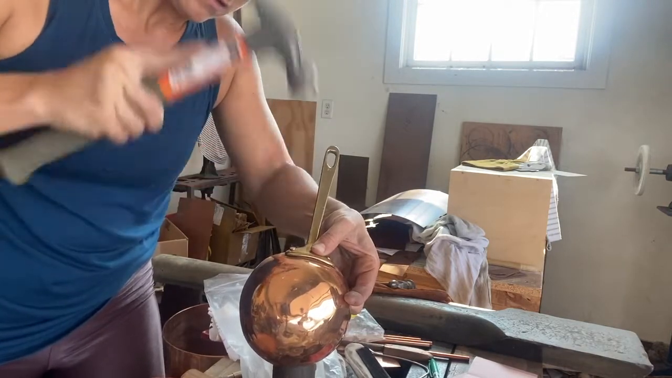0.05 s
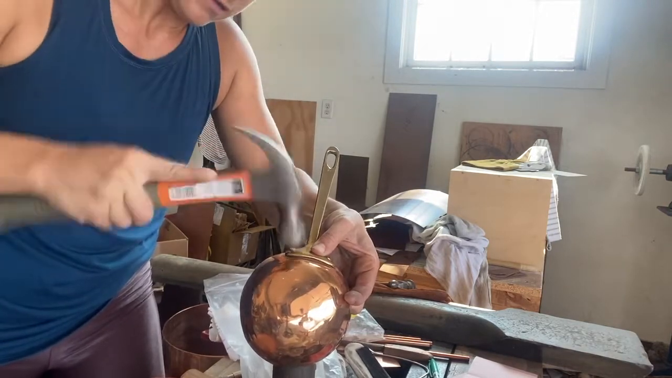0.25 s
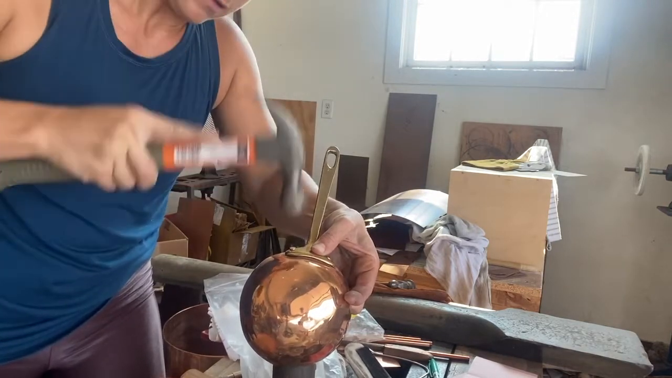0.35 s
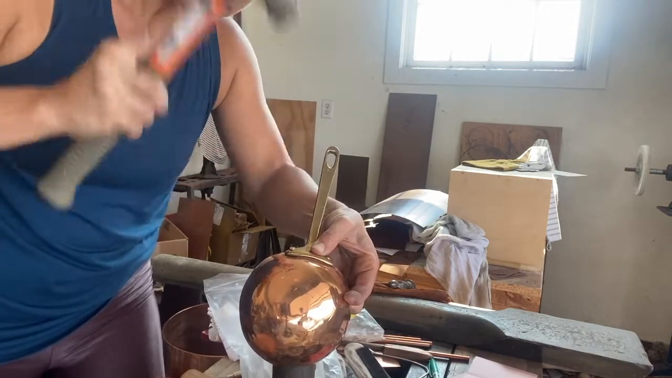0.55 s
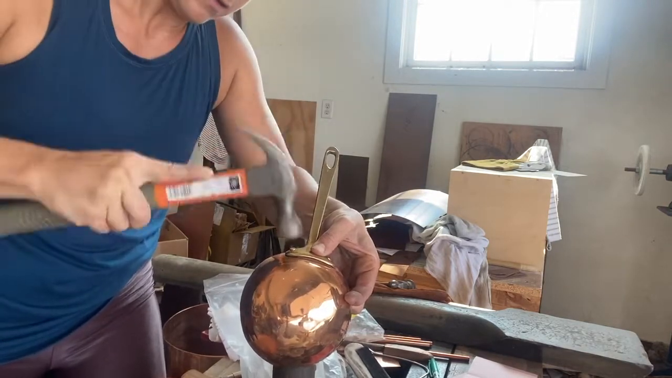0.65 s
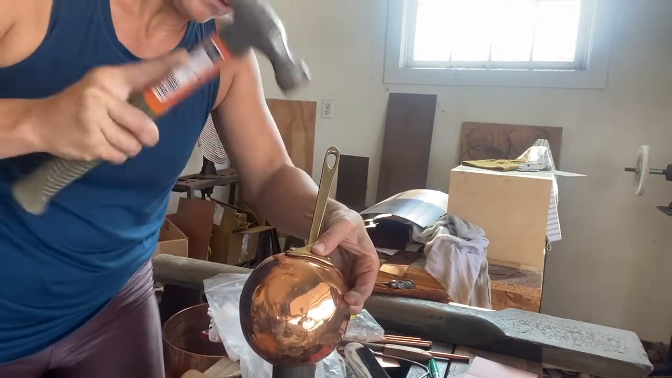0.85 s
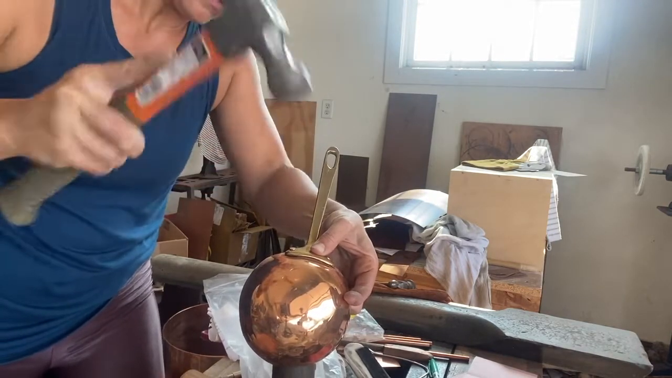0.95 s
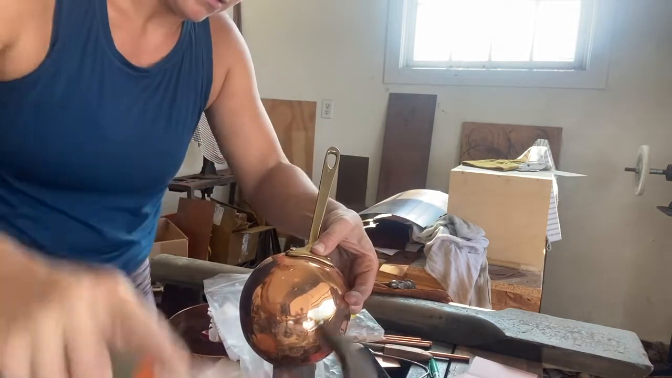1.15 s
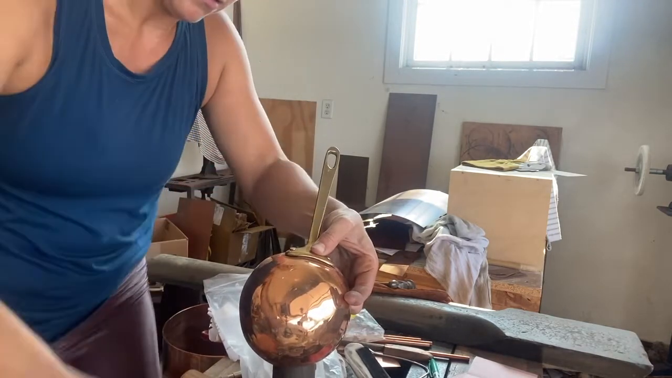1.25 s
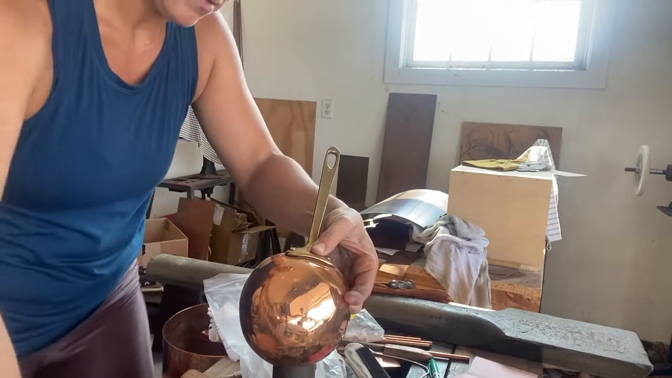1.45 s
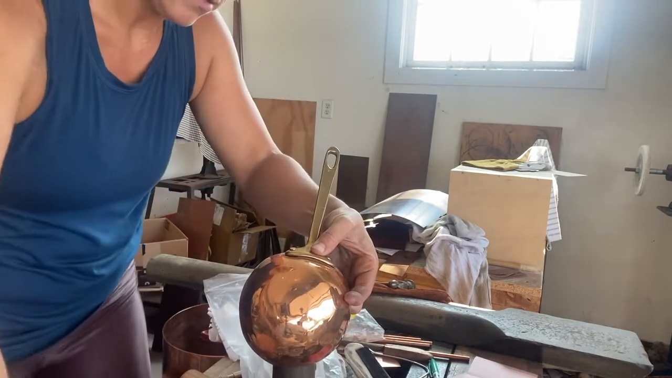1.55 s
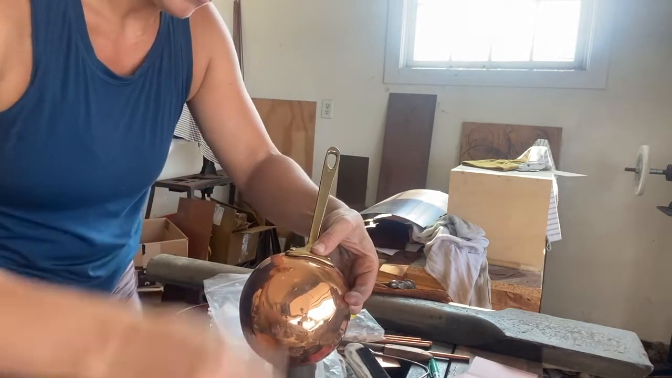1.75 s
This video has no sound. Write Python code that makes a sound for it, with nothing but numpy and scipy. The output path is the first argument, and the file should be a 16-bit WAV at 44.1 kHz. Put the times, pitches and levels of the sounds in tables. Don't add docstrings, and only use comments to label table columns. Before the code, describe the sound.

Hammer blows on a rivet in a copper bowl over an iron stake, close up in a small workshop. A fading metal rattle opens; at 0.23 s a sharp steel crack with copper knock, brief high ring and low thump; bowl and tools clink around 0.38-0.55. A harder blow lands at 0.61, rattling from 0.7 to 0.87. Then quiet low hum, very faint cloth rustle near 1.45.

```python
import sys
import numpy as np
from scipy import signal
from scipy.fft import rfft, irfft, next_fast_len
from scipy.io import wavfile
from scipy.ndimage import uniform_filter1d

SR = 44100
rng = np.random.default_rng(int(sys.argv[2]) if len(sys.argv) > 2 else 0)


def put_to_file(sound):
    columns = np.atleast_2d(sound).T
    safe = np.clip(columns, -1, 1)
    whole_steps = np.round(safe * 32767)
    wavfile.write(sys.argv[1], SR, whole_steps.astype(np.int16))


def level_to_linear(level):
    exponent = np.asarray(level, float) / 20
    return 10 ** exponent


N = 79380
SAG_S = 0.0072


def unit(x):
    return x / np.sqrt(np.mean(x ** 2) + 1e-20)


def along(points, hz):
    f, value = np.transpose(points)
    return np.interp(np.log(hz + 1), np.log(f + 1), value)


def filtered(x, response):
    size = next_fast_len(N + SR // 2)
    hz = np.fft.rfftfreq(size, 1 / SR)
    return irfft(rfft(x, size) * response(hz), size)[..., :N]


def rush(spectrum, alike, source=None):
    pair = rng.standard_normal((2, N))
    if source is not None:
        pair = pair * source

    def colour(hz):
        turn = np.arccos(np.clip(along(alike, hz), -1, 1)) / 2
        return level_to_linear(along(spectrum, hz)) * [np.cos(turn), np.sin(turn)]

    mid, side = filtered(pair, colour)
    return unit(np.array([mid + side, mid - side]))


def ring(s, hz, db, t60, lead=0, rise=.001, spread=0.2, sag_hz=0):
    out = np.zeros((2, N))
    first = int(s * SR) + 1
    t = np.arange(first, min(N, first + int(2 * t60 * SR))) / SR - s
    phase = rng.normal(0, 1, (2, 1)) * spread + lead * np.array([[.5], [-.5]])
    turns = hz * t + sag_hz * SAG_S * (1 - np.exp(-t / SAG_S))
    swell = 1 - np.exp(-t / abs(rise))
    out[:, first:first + len(t)] = level_to_linear(db - 60 * t / t60) * swell * np.sin(2 * np.pi * turns + phase)
    return out


# f/Hz, level/dB
CRACK_COLOUR = [(1500, -27.5), (3600, -8), (5200, -15), (8300, -1.5), (11000, -7.5), (13000, -7.5),
                (15500, -13.5)]
# f/Hz, level/dB
KNOCK_COLOUR = [(150, -10.5), (500, 3), (1500, -4.5), (2200, -8), (3700, -1.5), (5200, -12.5), (9000, -17)]
# f/Hz, likeness
NEAR = [(100, 0.88), (600, 1), (2500, 0.23), (6000, 0.26), (7500, 1)]


def crack(s, db, contact_s, shudder_db):
    crack_t60, shudder_t60 = .008, .08
    knock_db, knock_rise_s, knock_t60 = 1.5, 0.0011, .04
    t = np.arange(N) / SR - s
    struck, age = t > 0, np.abs(t)
    late = np.clip(t - contact_s, 0, None)
    snap = struck * (level_to_linear(-60 * late / crack_t60) + level_to_linear(shudder_db - 60 * late / shudder_t60))
    give = struck * (1 - np.exp(-age / knock_rise_s))
    give = give * (level_to_linear(-60 * age / knock_t60) + level_to_linear(-16 - 60 * late / .15))
    steel = snap * rush(CRACK_COLOUR, NEAR)
    copper = level_to_linear(knock_db) * give * rush(KNOCK_COLOUR, NEAR)
    return level_to_linear(db) * (steel + copper)


# f/Hz, level/dB, time to fall 60 dB/s
STAKE = [(1207, -18, 0.17), (1510, -11, .08), (2480, -16.5, 0.068), (3465, -8, .05), (5850, -17.5, .03),
         (6200, -26, 0.23), (7000, -21, .1), (8210, -5.5, .06), (8200, 4.5, .06), (8670, -4.5, 0.049),
         (9550, -13, .06), (9600, -13.5, 0.04), (12300, -13.5, 0.068)]


def stake_ring(s, contact_s, blow_db):
    level_db, damp_db, damp_s = -16.5, -19, 0.00089
    late = np.clip(np.arange(N) / SR - s - contact_s, 0, None)
    modes = 0
    for hz, mode_db, t60 in STAKE:
        db = level_db + blow_db + mode_db + rng.normal(0, 2)
        modes = modes + ring(s, hz, db, t60, rise=.0005, spread=1000 / hz)
    return modes * level_to_linear(damp_db * (1 - np.exp(-late / damp_s)))


# t/s, f/Hz, level/dB, time to fall 60 dB/s, left lead/rad
THUMPS = [(.2345, 90, -6, 0.061, -.4), (.228, 330, -12, .04, -.15), (.229, 670, -15.5, 0.037, 0.26),
          (.2265, 995, -15, .05, .6), (.229, 550, -16, .04, -.1), (.225, 3530, -12.5, 0.031, -1),
          (.24, 200, -31, 0.14, -.1), (.6143, 235, -7, .035, -.5), (.62, 64, -15, 0.1, -1.3),
          (.6118, 640, -11, .03, 0.99), (.613, 1020, -19.5, .08, .2), (.6148, 330, -15, .06, -.7),
          (.6128, 500, -11, .03, -0.45), (.612, 860, -15, .035, .2), (.611, 4150, -13, .02, -1.9),
          (.7, 48, -46, 0.82, 0), (1.605, 390, -65, 0.053, 0.24)]
# t/s, level/dB, left lead/rad
SAGS = [
    (0.232, -25.5, -.4),
    (.6155, -17.5, -1.1),
]


def thump():
    out = sum(ring(*row, rise=0.0032, spread=0) for row in THUMPS)
    for s, db, lead in SAGS:
        out = out + ring(s, 55, db, 0.13, lead, rise=0.0018, spread=0, sag_hz=331)
    return out


# t/s, crack level/dB, contact time/s, ring level/dB, shudder level/dB
BLOWS = [
    (0.2251, -15.5, .0095, -2, -20),
    (.6100, -13.5, 0.0066, 0.5, -12.5),
]


def hammer():
    stand = thump()
    cracks = steel = 0
    for s, crack_db, contact_s, ring_db, shudder_db in BLOWS:
        steel = steel + stake_ring(s, contact_s, ring_db)
        cracks = cracks + crack(s, crack_db, contact_s, shudder_db)
    return cracks, steel, stand


# t/s, peak level/dB
CLINKS = [(0.0177, -31), (0.0367, -31), (0.074, -39.5), (0.0883, -34), (0.124, -35), (0.1344, -56),
          (0.16, -39), (0.378, -39), (0.3832, -30), (0.41, -35), (0.416, -34), (0.4338, -35.5),
          (0.4444, -39.5), (0.4687, -33.5), (0.4824, -33.5), (0.4975, -42), (0.5111, -41), (0.5467, -46),
          (0.7035, -31), (0.763, -40), (0.7797, -33), (0.8006, -35), (0.8156, -51), (0.8284, -37.5),
          (0.8434, -47), (0.8704, -42)]


def clinks():
    out = 0
    for s, db in CLINKS:
        clink_hz = 1480 * (1 + 0.035 * rng.normal())
        out = out + ring(s, clink_hz, db + 6, 0.021, rise=0.003)
        out = out + ring(s, 1535, db - 7.5, 0.063)
    return out


# peak t/s, level/dB, hold/s, fall/dB per s
RATTLES = [
    (0.006, -37, 0.027, 111.5),
    (0.407, -37, 0.01, 111),
    (0.756, -39, 0.082, 174),
]
# f/Hz, level/dB
RATTLE_COLOUR = [(60, -22.5), (180, -6.5), (500, -8), (1550, -3), (3000, -6.5), (5200, -13.5),
                 (8500, -11.5), (15300, -21.5)]
# f/Hz, likeness
FAR = [(100, .8), (600, .5), (1500, .65), (2800, .2), (6300, .15), (7300, .995)]


def rattle():
    rise_db_per_s, grain_db = 130, -10.5
    t = np.arange(N) / SR
    shake = 0
    for s, db, hold, fall in RATTLES:
        before, after = np.clip(s - t, 0, None), np.clip(t - s - hold, 0, None)
        shake = shake + level_to_linear(db - rise_db_per_s * before - fall * after)
    hits = (rng.random(N) < 500 / SR) * level_to_linear(rng.uniform(0, 14, N))
    grains = np.convolve(hits, np.exp(-np.arange(200) / 40))[:N]
    bowl = clinks()
    return shake * rush(RATTLE_COLOUR, FAR, 1 + level_to_linear(grain_db) * unit(grains)) + bowl


def bowl_whine():
    waver = level_to_linear(2.5 * unit(uniform_filter1d(rng.standard_normal(N), SR // 20)))
    return waver * ring(BLOWS[-1][0], 4040, -77, 2.2, lead=-1.3)


# f/Hz, time to fall 60 dB/s
ROOM = [(60, 0.063), (400, .7), (1500, .42), (6000, .5), (14000, 0.16)]


def room(x):
    hz, t, noise = signal.stft(rush([(100, 0)], FAR)[:, :SR], SR, nperseg=256)
    fade = level_to_linear(-60 * t / along(ROOM, hz)[:, None])
    tail = signal.istft(noise * fade, SR, nperseg=256)[1]
    tail = tail / np.linalg.norm(tail[0])
    return signal.fftconvolve(x.mean(0)[None], tail, axes=1)[:, :N]


# f/Hz, level/dB
HUM_COLOUR = [(20, -25.5), (58, 0), (150, -19), (200, -17.5), (380, -32.5), (1200, -46.5), (6000, -53.5),
              (8800, -47.5), (15000, -54.5)]
# f/Hz, likeness
HUM_ALIKE = [(100, .85), (500, .1), (6500, .05), (8000, .8)]


def hum():
    return level_to_linear(-65) * rush(HUM_COLOUR, HUM_ALIKE)


# t/s, level/dB, width/s
RUSTLES = [
    (1.443, -79, .014),
    (1.552, -87, .01),
    (1.49, -85, .04),
]


def cloth():
    t = np.arange(N) / SR
    swell = sum(level_to_linear(db) * np.exp(-((t - s) / width) ** 2) for s, db, width in RUSTLES)
    return swell * rush(RATTLE_COLOUR, FAR)


# f/Hz, left minus right level/dB
LEAN = [(100, 1.5), (300, -7), (1300, -5), (8000, -1.5)]


def scene():
    cracks, steel, stand = hammer()
    loose = rattle()
    blows = filtered(cracks + steel + stand, lambda hz: level_to_linear(along(LEAN, hz) * [[.5], [-.5]]))
    blow_echo = level_to_linear(-12) * room(cracks + 0.26 * steel + .4 * stand)
    loose_echo = level_to_linear(-8) * room(loose)
    return blows + blow_echo + loose + loose_echo + bowl_whine() + hum() + cloth()


def low_pass(x):
    return signal.sosfilt(signal.butter(12, 16190, fs=SR, output="sos"), x)


def record(dry):
    lag_from_hz, lag_turn_hz = 2625, 5250
    low_hz, top_hz, edge_hz, clip = 34, 15500, 200, .95

    def ports(hz):
        lead = np.pi * np.clip(hz - lag_from_hz, 0, None) / lag_turn_hz * [[1], [-1]]
        low_cut = 1j * hz / (1j * hz + low_hz)
        high_cut = level_to_linear(-6 * np.clip(hz - top_hz, 0, None) / edge_hz)
        return np.exp(1j * lead) * low_cut * high_cut

    squashed = dry / (1 + np.abs(dry / clip) ** 4) ** (1 / 4)
    return low_pass(filtered(squashed, ports))


dry = scene()
out = record(dry)
put_to_file(out)
```